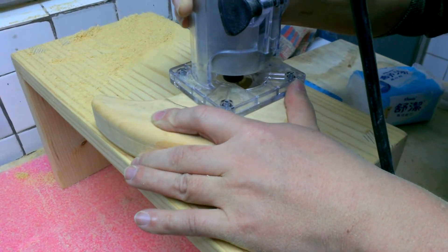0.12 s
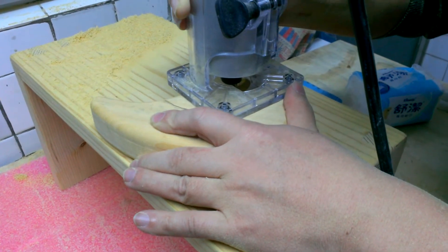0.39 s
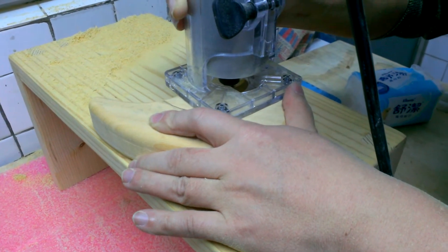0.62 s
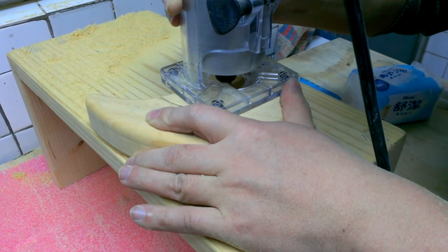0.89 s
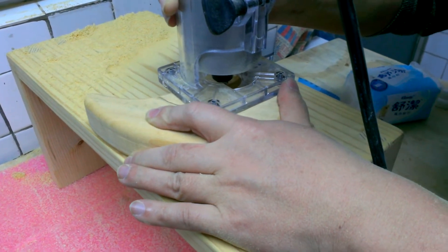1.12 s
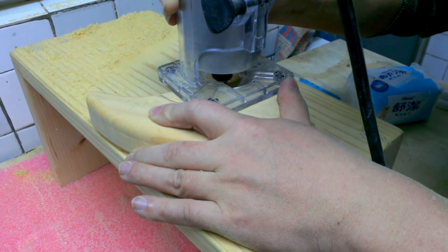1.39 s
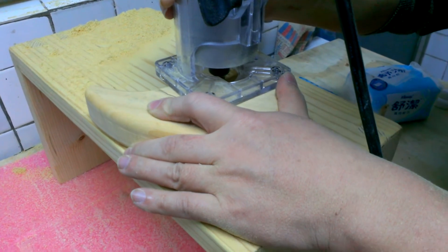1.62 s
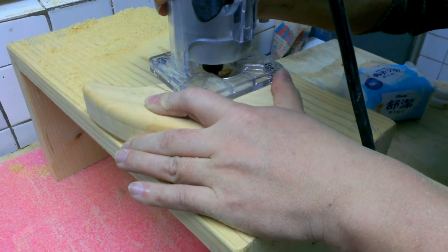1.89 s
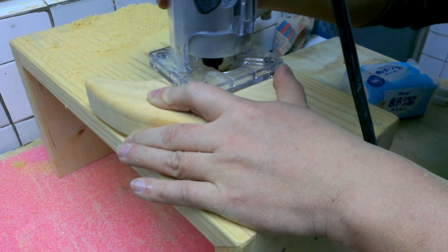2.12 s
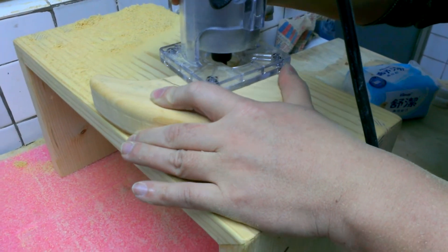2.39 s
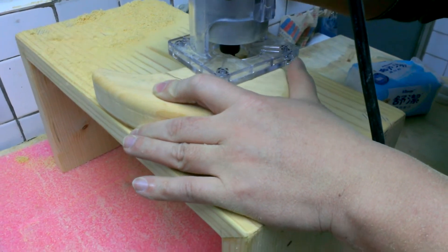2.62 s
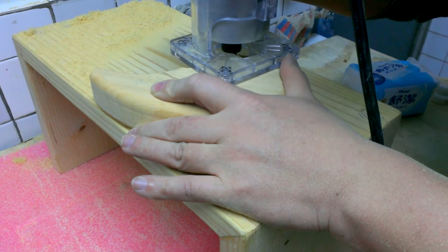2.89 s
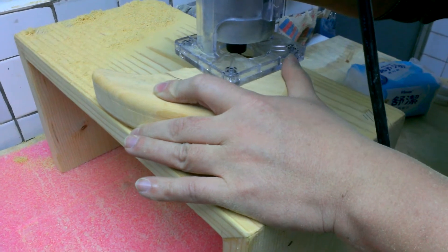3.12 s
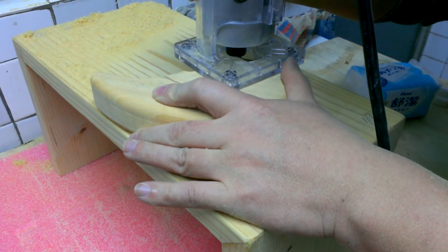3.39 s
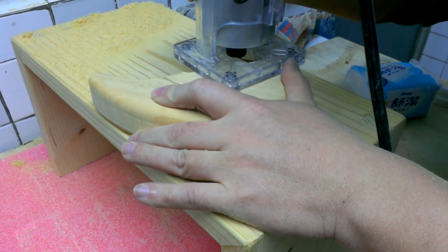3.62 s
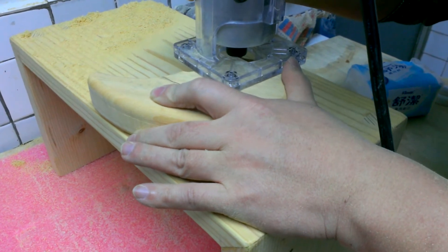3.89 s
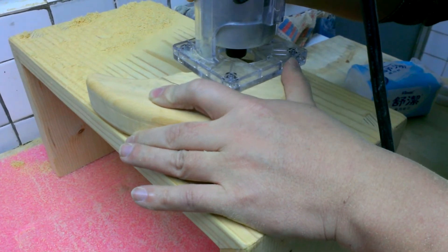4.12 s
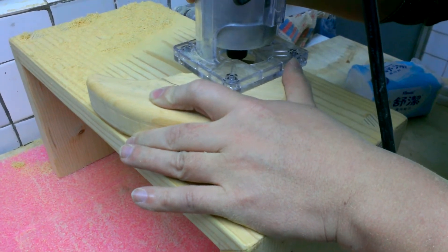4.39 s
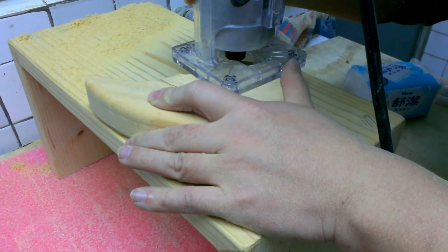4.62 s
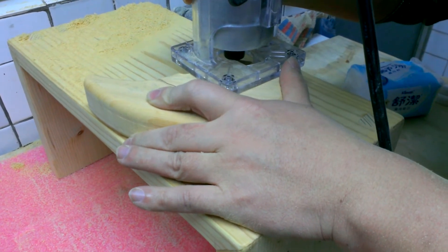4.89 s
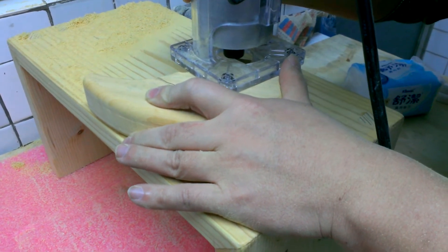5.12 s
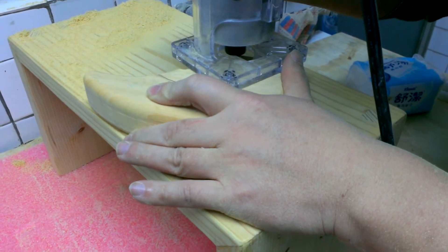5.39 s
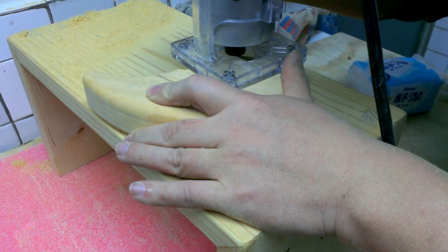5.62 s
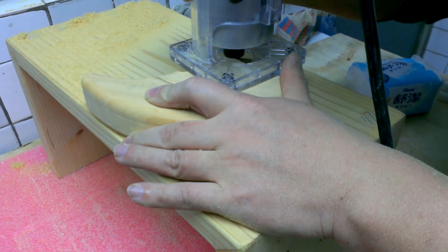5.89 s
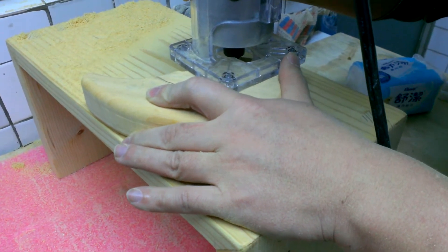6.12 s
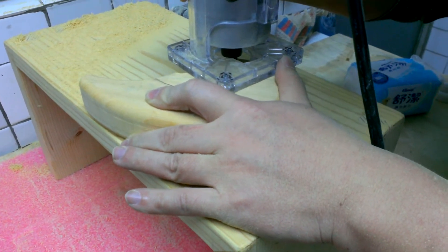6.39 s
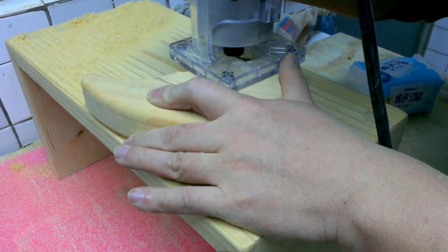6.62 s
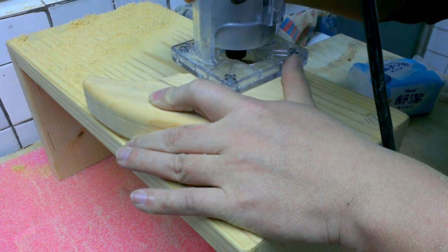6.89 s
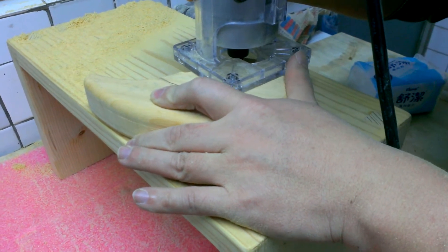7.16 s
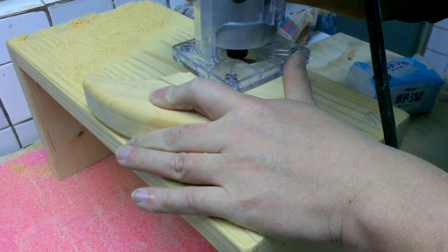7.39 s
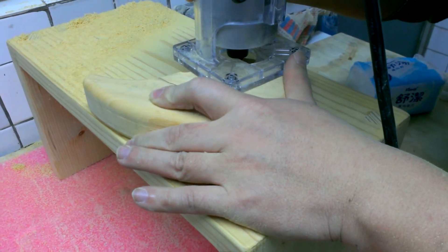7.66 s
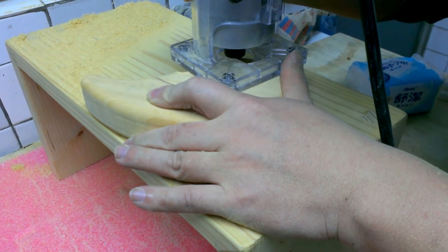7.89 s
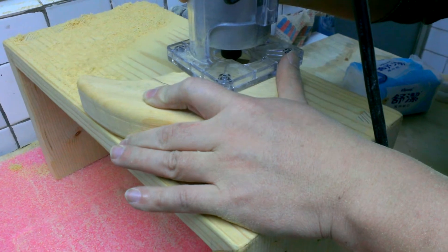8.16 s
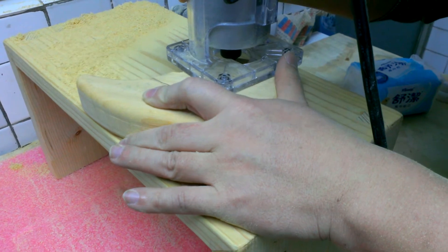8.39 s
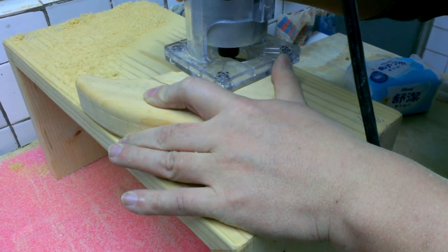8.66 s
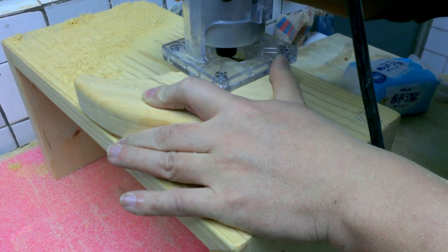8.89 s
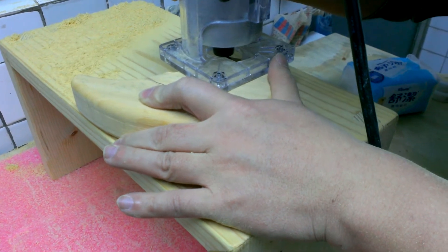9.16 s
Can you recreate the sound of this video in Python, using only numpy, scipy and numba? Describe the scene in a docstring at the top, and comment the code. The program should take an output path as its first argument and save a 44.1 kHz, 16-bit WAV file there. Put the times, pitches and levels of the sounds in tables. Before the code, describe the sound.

A small handheld router runs continuously at close range in a small tiled workshop. It begins mid-cut with a harsh, ringing buzz, climbs to a cleaner, airy whine as it leaves the wood, then bites twice more, the pitch sagging each time and recovering between. Cooling air roars and chips hiss. Close stereo microphone, slightly saturated, with faint low buffeting.

```python
"""Hand router on a wooden edge

A small router trims a wooden edge in a tiled workshop, heard at two microphone ports over three passes.
The shaft slows under load. The cutter strikes once a turn and rings board and base: sines on multiples
of the shaft angle sweep through fixed modes. Motor whine and unbalance hum are sines on the same angle.
Cooling air, fan rush and chip hiss are coloured noise following speed and bite; the treble sinks at times.
Gusts of the air stream buffet the ports as low-frequency noise."""
import sys
import numpy as np
from scipy import signal
from scipy.fft import rfft, irfft, next_fast_len
from scipy.io import wavfile
from scipy.ndimage import uniform_filter1d
from numba import njit

SR = 44100
rng = np.random.default_rng(int(sys.argv[2]) if len(sys.argv) > 2 else 0)


def dump_mix(stems):
    """Bounce the given channels to the path in sys.argv[1] as a 16-bit WAV at rate SR."""
    frames = np.atleast_2d(stems).T  # one column per channel
    limited = np.clip(frames, -1, 1)  # hard clip at full scale
    pcm = np.round(limited * 32767).astype(np.int16)
    wavfile.write(sys.argv[1], SR, pcm)


def voltage_ratio(decibels):
    """Convert decibels (scalar or array-like) to amplitude ratios, 20 dB per decade."""
    exponent = np.asarray(decibels, float) / 20
    return 10 ** exponent


N = 408807  # length in samples
STEP = 64  # samples between control points

# shaft slowing under load and recovering: t/s, rotation f/Hz, unbalance hum level/dB
SHAFT_SPEED = [(0.0, 424.1, -24.5), (0.45, 426.1, -22), (0.9, 428.9, -26.5), (1.3, 433.5, -30.5),
               (1.62, 440, -39.5), (1.78, 442.7, -27), (2.0, 448, -31.5), (2.18, 457, -31),
               (2.5, 482.7, -34), (2.9, 505, -26), (3.3, 514.5, -30), (3.75, 525, -33), (4.1, 527.5, -35),
               (4.45, 524, -30.5), (4.88, 504, -18), (5.14, 490.2, -29), (5.5, 470.3, -22),
               (5.8, 457.1, -28), (6.07, 447.3, -22), (6.26, 464.3, -36.5), (6.38, 474.3, -28),
               (6.64, 480.3, -31), (6.88, 493, -25), (7.16, 496, -24.5), (7.36, 489, -28.5),
               (7.64, 469.3, -21), (7.84, 456.4, -26), (7.96, 452.2, -19), (8.36, 433, -28),
               (8.47, 435.4, -26), (8.7, 460.3, -35), (9.0, 480.4, -28.5), (9.27, 494.5, -25.5)]
# bit meeting the wood in three passes:
# t/s, relative cutter tone level/dB, even-multiple excess (-1 to 1), tilt/(dB per octave)
CUTTER_BITE = [(0.0, -14.5, -0.022, -0.5), (.4, -13.5, 0.082, 1.7), (0.85, -15, .06, 0.2),
               (1.2, -14, -.2, 1.5), (1.65, -12, -0.15, -0.5), (1.9, -13.5, -0.017, 3), (2.17, -15, .1, 3),
               (2.24, -28, .26, 7), (3.85, -27.5, .2, 18.5), (4.05, -18, 0.044, 8.5),
               (4.25, -13.5, -0.044, 6), (4.55, -12.5, .16, -0.6), (4.8, -13, -.14, 0.5),
               (5.1, -11.5, .14, -5), (5.25, -9.5, .35, -3.5), (5.4, -13.5, .42, -5.5),
               (5.55, -15.5, .34, -4), (5.75, -12, .18, -0.7), (6.08, -14, -0.038, -3.5),
               (6.14, -27, .05, -3), (6.32, -26, .2, 4), (6.39, -11, .38, 7), (6.62, -14.5, 0.07, 2.5),
               (6.9, -15.5, 0.5, 10), (7.25, -10, .2, -1), (7.45, -9.5, 0.38, -4.5), (7.72, -16, 0.16, -2),
               (7.84, -13.5, .07, -2.2), (7.95, -17.5, 0.1, -4), (8.1, -16, 0.39, -7.5),
               (8.25, -15.5, 0.42, -2.5), (8.45, -18, 0.21, -1.5), (8.52, -26, .25, 0.1),
               (9.27, -21.5, .4, 8)]
# modes of board and base, rung by the cutter: f/Hz, width/Hz, relative left level/dB, right level/dB
BOARD_MODES = [(864.7, 29, -1.5, -8), (931.6, 38, -6.5, -5), (1016.4, 80, -7, -8.5),
               (1286.0, 34.4, -5, 0.5), (1340, 44.0, -12, -20), (1410, 64, -6, -2), (1506, 52, -5.5, -12),
               (1724, 33, -8.5, -6.5), (1770, 51, -6.5, -10), (1858, 37, -9, -6.5), (1907, 34, -12, -10),
               (1990, 20, -10.0, -15), (2209, 50, -6.5, -3.5), (2337, 52, -4.5, -2), (2471, 174, -8, -2.0),
               (2610, 18, -9, -15.0), (2687, 35, -8.5, -8.5), (3065, 140, -21.0, -5.5),
               (3246, 65, -3.5, -9), (3314, 52, -10, -1.5), (3470, 54, -28, -8.5), (3627, 84, -19, -7.5),
               (3810, 14, -26.0, -17), (4173, 170, -20, -11.5), (4340, 62, -22, -13),
               (4454, 160, -20, -11.5), (4668, 91, -17, -11.5), (4936, 49, -23, -13.5),
               (5500, 43, -29, -28), (5630, 55, -28, -17), (5840, 92, -24, -18)]
# cutter tones between the modes: f/Hz, relative left level/dB, right level/dB
BETWEEN_MODES = [(800.0, -19, -12), (1600.0, -15.5, -28), (2750, -14.5, -16.5), (3970, -21, -20),
                 (5200, -31, -24.5), (7400, -49, -26.5)]
# upper cutter tones: f/Hz, relative left level/dB, right level/dB
UPPER_TONES = [(6505, -30, 1), (7400, -6, -3.5), (9640, -11, 3), (11540, -12.5, -5.5), (13600, -17, -18),
               (15700, -14, -15)]
# motor whine, with or without load: multiple of shaft speed (rounded in use), left level/dB, right level/dB
MOTOR_ORDERS = [(5, -42, -32.5), (8, -34, -28.5), (12, -44, -27), (13, -52, -35), (16.3, -58, -35.5),
                (24, -60, -47)]
# phase of the tones at the right port against the left: f/Hz, phase/rad
PORT_PHASE = [(450, -2.5), (900, -2.), (1280, -1.2), (1480, -2), (1700, 1.04), (2200, 1.5), (2450, 0.5),
              (2750, -1.5), (3050, 0.25), (3400, 3.), (16000, 30.)]
# cooling-air spectrum: f/Hz, relative left level/(dB per Hz), right level/(dB per Hz)
AIR_COLOUR = [(35, -40, -50), (117, -22, -25), (396, -15, -14), (575, -16, -17), (843, -3.5, -4.5),
              (1180, -10.5, -6.5), (1550, -7.5, -7.5), (2200, -2.5, -2), (2500, -2, 1), (3180, -8.5, -1.5),
              (4240, -11.5, -3.5), (5400, -11.5, -4.5), (6690, -24.5, -5.5), (7600, -45, -17.5),
              (9000, -60, -57)]
# motor-housing resonances in the cooling air: f/Hz, width/Hz, boost level/dB
HOUSING_MODES = [(920, 130, 1), (2648, 27, 7), (2970, 36, 0.5), (4170, 84, 5), (5200, 70, 2), (6050, 80, 2)]
# air chopped by the fan: multiple of shaft speed, width/Hz, left level/dB, right level/dB re cooling air
FAN_BAND = (8, 159.5, -29, -16)
# chip-hiss spectrum: f/Hz, relative left level/(dB per Hz), right level/(dB per Hz)
HISS_COLOUR = [(6250, -32, -27), (6880, -17, 0.5), (9930, -27, -4), (10820, -33, -10.5), (12200, -29, -18),
               (13500, -36, -38), (14600, -36, -36), (15600, -26, -22)]
# sinking and return of the treble: deepest t/s, fall time/s, return time/s, depth level/dB
TREBLE_DIPS = [(.18, .12, .04, 10), (.3, .2, .3, 4.5), (.5, .08, .2, 9), (.68, 0.38, .05, 14),
               (.8, .08, .08, 4), (1.0, .1, .1, 6), (1.2, .2, .2, 3), (1.6, 0.14, 0.17, 9),
               (1.8, .2, 0.13, 3), (1.94, .05, .07, 6), (2.2, 0.19, .3, 4), (2.55, .05, .1, 2),
               (3.65, .06, 0.097, 4), (4.28, .15, .03, 5), (4.7, .3, .15, 3.5), (5.02, 0.11, .06, 8.5),
               (5.14, 0.12, 0.12, 15), (5.53, 0.17, .12, 4), (5.71, .08, 0.048, 7), (5.93, 0.1, .1, 5),
               (6.11, 0.13, .09, 26), (6.24, .15, 0.15, 12), (6.7, 0.14, 0.068, 15), (6.95, 0.071, .08, 0),
               (7.34, 0.079, .08, 3.5), (8.03, .06, .06, 8), (8.12, .08, .05, 14), (8.22, 0.092, .08, 7),
               (8.42, .12, .02, 16), (8.53, .06, 0.21, 10), (8.84, .06, .2, 13), (9.0, 0.14, .15, 7),
               (9.16, 0.22, .02, 10)]
# buffeting spectrum: f/Hz, relative left level/(dB per Hz), right level/(dB per Hz)
BUFFET_SPECTRUM = [(15, -18, -3.5), (40, -24, -6.5), (80, -2, -2.5), (159.9, -8.5, -3.5), (304, -9, -6),
                   (600.7, -28, -31)]
# gusts of the air stream on the ports: start t/s, length/s, level/dB
PORT_GUSTS = [(.2, .15, -50), (.55, .5, -54), (1.95, .12, -52), (3.3, 1.2, -57), (4.5, 0.61, -47),
              (5.1, .6, -41.5), (5.7, .3, -47), (6.4, .15, -51), (6.8, .3, -53), (7.08, 0.64, -40),
              (7.7, .2, -48), (8.25, 0.097, -50)]
# likeness of noise at the two ports, before scaling by source: f/Hz, share (0 to 1)
PORT_LIKENESS = [(60, 0.2), (250, 0.9), (700, 0.69), (1500, 0.47), (2500, 0.21), (5000, 0.17), (8000, 0.05)]


def table(rows, at, log=False):
    """Piecewise-linear interpolation of a table's columns along its first, optionally on a log axis."""
    x, *columns = np.transpose(np.array(rows, float))
    if log:
        at, x = np.log(at), np.log(x)
    return np.array([np.interp(at, x, column) for column in columns])


def walk(rate, count):
    """Band-limited fluctuation: held random values, smoothed twice, at control points, spread near 1."""
    hold = max(int(SR / STEP / rate), 1)
    held = np.repeat(rng.standard_normal((count, N // STEP // hold + 2)), hold, axis=1)
    smooth = uniform_filter1d(uniform_filter1d(held, hold), hold)
    return 1.35 * smooth[:, :N // STEP + 1]


def unit(x):
    """Normalisation of the mean power over both ports to one."""
    return x / np.sqrt(np.mean(x ** 2))


def noise(colour, peaks=(), like=1.):
    """Partial coherence: coloured noise whose shared part reaches the right port inverted and early."""
    lead_s = .00033
    size = next_fast_len(N)
    hz = np.maximum(np.arange(size // 2 + 1) * SR / size, 1.)
    left, own = rfft(rng.standard_normal((2, size)))
    share = np.clip(like * table(PORT_LIKENESS, hz, log=True)[0], 0, 1)
    shared = -share * left * np.exp(2j * np.pi * hz * lead_s)
    right = shared + np.sqrt(1 - share ** 2) * own  # keeps the power
    db = table(colour, hz, log=True)
    for centre, width, peak_db in peaks:
        db = db + peak_db / (1 + (2 * (hz - centre) / width) ** 2)
    return unit(irfft(np.array([left, right]) * voltage_ratio(db), size)[:, :N])


@njit
def partials(turn, orders, gain, shift, step):
    """Harmonic synthesis: sines on multiples of the shaft angle, gain and phase gliding between controls."""
    out = np.zeros((2, len(turn)))
    for c in range(2):
        for k in range(len(orders)):
            for i in range(len(turn)):
                j = min(i // step, gain.shape[2] - 2)
                u = i % step / step
                g = gain[c, k, j] + u * (gain[c, k, j + 1] - gain[c, k, j])
                phase = shift[c, k, j] + u * (shift[c, k, j + 1] - shift[c, k, j])
                out[c, i] += g * np.sin(orders[k] * turn[i] + phase)
    return out


def colour_power(colour, f):
    """Spectral envelope: power at both ports for every tone frequency, ordered port, tone, time."""
    db = np.array([table(colour, row, log=True) for row in f])
    return voltage_ratio(2 * db.transpose(1, 0, 2))


def cutter(hz, cut_db, sharp_db, second, tilt_db):
    """Forced vibration: multiples 2-37 of the strike rate sweep through the modes of board and base."""
    k = np.arange(2, 38)[:, None]
    f = k * hz
    power = colour_power(BETWEEN_MODES, f) / (1 + (f / 6170.0) ** 12)
    for centre, width, left_db, right_db in BOARD_MODES:
        peak = voltage_ratio(2 * np.array([left_db, right_db]))[:, None, None]
        power = power + peak / (1 + (2 * (f - centre) / width) ** 2) ** 2
    # a blow half a turn later strengthens the even multiples; a short contact brightens the series
    second_blow = 1 + second * (-1.) ** k
    blow = second_blow * voltage_ratio(cut_db + tilt_db * np.log2(k / 5))
    sharp = colour_power(UPPER_TONES, f) * (f > 6000) * (f < 15900)
    return np.sqrt(power * blow ** 2 + sharp / 8.0 * voltage_ratio(2 * sharp_db))


def motor_whine(gain, hz, treble_db):
    """Slot-order excitation: whine power adds to the tones on the nearest multiples of shaft speed."""
    for order, left_db, right_db in MOTOR_ORDERS:
        k = int(round(order)) - 1
        # whines above 7 kHz rise and fall with the treble
        swing_db = (order * hz > 7000) * (treble_db[::STEP] - treble_db.mean())
        whine = voltage_ratio(np.array([[left_db], [right_db]]) + swing_db)
        gain[:, k] = np.hypot(gain[:, k], whine)
    return gain


def tones(hz, cut_db, sharp_db, second, tilt_db, hum_db, treble_db):
    """Rotating-source spectrum: hum, whine and cutter tones, wavering as the tool moves in room echoes."""
    orders, slow_hz = np.arange(1., 38), hz[::STEP]
    gain = np.zeros((2, 37, len(slow_hz)))
    gain[:, 0] = voltage_ratio(hum_db[::STEP] + np.array([[-1.5], [1.8]]))  # unbalance, left and right offset in dB
    gain[:, 1:] = cutter(slow_hz, cut_db[::STEP], sharp_db[::STEP], second[::STEP], tilt_db[::STEP])
    gain = motor_whine(gain, slow_hz, treble_db)

    def waver(rate, growth, limit):
        """Bounded fluctuation that deepens with the multiple up to a limit."""
        depth = np.minimum(growth * orders, limit)[:, None]
        curves = np.tanh(walk(rate, count=74)).reshape(2, 37, -1)
        return depth * curves[..., :len(slow_hz)]

    gain = gain * voltage_ratio(waver(8., 0.3, 7.) + waver(45., 0.74, 3.8))  # depths in dB
    start = rng.uniform(0, 2 * np.pi, (37, 1))
    shift = start + waver(5., 0.1, 1.6) + waver(30., 0.11, 1.3)  # depths in radians
    shift[1] += np.array([table(PORT_PHASE, order * slow_hz)[0] for order in orders])
    turn = 2 * np.pi * np.cumsum(hz) / SR
    return np.sqrt(2) * partials(turn, orders, gain, shift, STEP)


def fan(hz):
    """Quadrature modulation: two slow noises make a narrow band of rush on the blade rate."""
    blades, width, *db = FAN_BAND
    turn = 2 * np.pi * round(blades) * np.cumsum(hz) / SR
    a, b = uniform_filter1d(rng.standard_normal((2, 2, N)), int(SR / width))
    return voltage_ratio(np.array(db))[:, None] * unit(a * np.cos(turn) + b * np.sin(turn))


def cooling_air(hz, speed, bite, flicker):
    """Flow noise: broadband roar, coloured by the housing and joined by the fan, grows with shaft speed."""
    # level in dB at mid speed, dB per octave of speed, dB per dB of bite
    level_db = -14.5 + 12.5 * speed + 0.03 * bite
    return voltage_ratio(level_db + 0.41 * flicker) * (noise(AIR_COLOUR, HOUSING_MODES) + fan(hz))


def chip_hiss(treble_db, flicker):
    """Random impact noise: the chips' high-frequency noise follows the treble level, 3 dB above it."""
    return voltage_ratio(treble_db + 3 + 1.0 * flicker) * noise(HISS_COLOUR)


def gate(t, start, length, edge):
    """Trapezoidal envelope: one from start for length seconds, with sloping edges."""
    return np.clip(np.minimum(t - start, start + length - t) / edge + .5, 0, 1)


def buffeting(t):
    """Flow pressure fluctuation: weakly alike low noise at the ports, swelling in gusts."""
    calm_db, edge_s = -61, 0.093
    gusts = voltage_ratio(calm_db)
    for start, length, db in PORT_GUSTS:
        gusts = gusts + voltage_ratio(db) * gate(t, start, length, edge_s)
    return gusts * noise(BUFFET_SPECTRUM, like=0.17)


def treble_dip(t):
    """Envelope attenuation: the deepest of the treble's triangular dips at each moment, in dB."""
    dips = [np.interp(t, [s - fall, s, s + rise], [0, db, 0]) for s, fall, rise, db in TREBLE_DIPS]
    return np.max(dips, axis=0)


def scene():
    """Superposition: tones, cooling air, chip hiss and buffeting, coupled by speed and bite, add up."""
    t = np.arange(N) / SR
    hz, hum_db = table(SHAFT_SPEED, t)
    cut_db, second, tilt_db = table(CUTTER_BITE, t)
    # the rotor's inertia rounds every change of speed over 0.12 s
    hz = uniform_filter1d(hz, int(.12 * SR))
    speed = np.log2(hz / 470)  # octaves from mid speed
    bite = cut_db + 13  # dB from full bite
    # dB at mid speed, dB per octave of speed, dB per dB of bite
    treble_db = -26.5 + 29.5 * speed + 0.18 * bite - treble_dip(t)
    # upper cutter tones over the treble: dB at steady speed, dB per Hz/s of slowing, dB per dB of bite
    slowing = -np.gradient(hz) * SR
    sharp_db = treble_db - 1.5 + 0.08 * slowing + 0.65 * bite
    flicker = np.repeat(walk(14., count=2), STEP, axis=1)[:, :N]
    mix = tones(hz, cut_db, sharp_db, second, tilt_db, hum_db, treble_db)
    mix = mix + cooling_air(hz, speed, bite, flicker[0])
    mix = mix + chip_hiss(treble_db, flicker[1])
    return mix + buffeting(t)


def top_cut(x):
    """Nothing passes above the cut-off."""
    return signal.sosfilt(signal.butter(12, 15910, fs=SR, output="sos"), x)


def record(dry):
    """Saturation: a hyperbolic tangent rounds the loudest peaks, then full scale clips them."""
    rounded = 1.535 * np.tanh(dry / 1.466)
    return top_cut(np.clip(rounded, -1, 1))


dry = scene()
out = record(dry)
dump_mix(out)
```